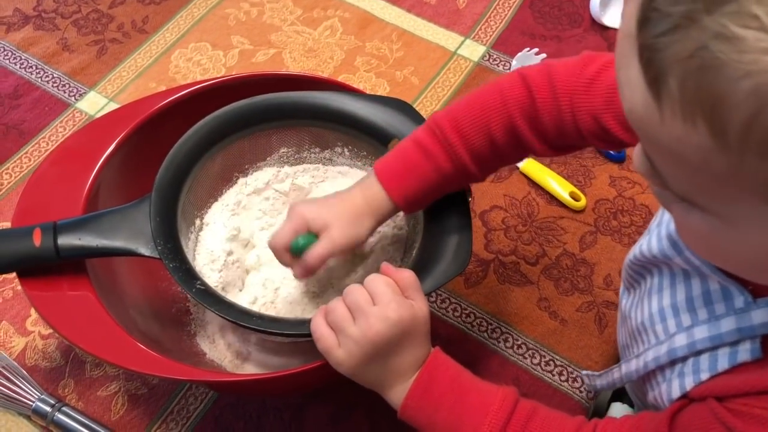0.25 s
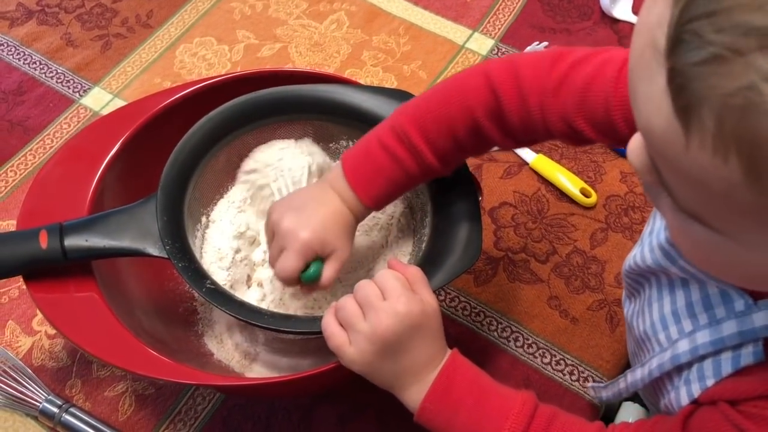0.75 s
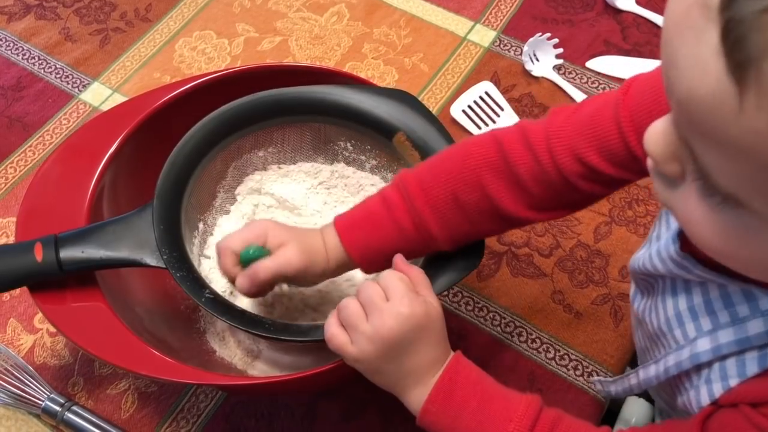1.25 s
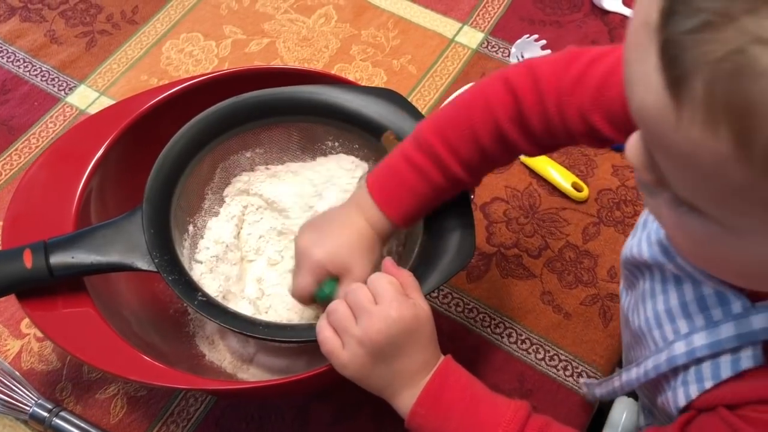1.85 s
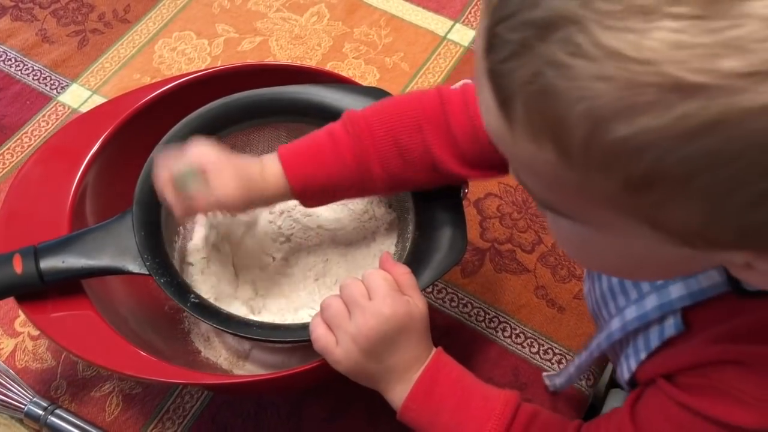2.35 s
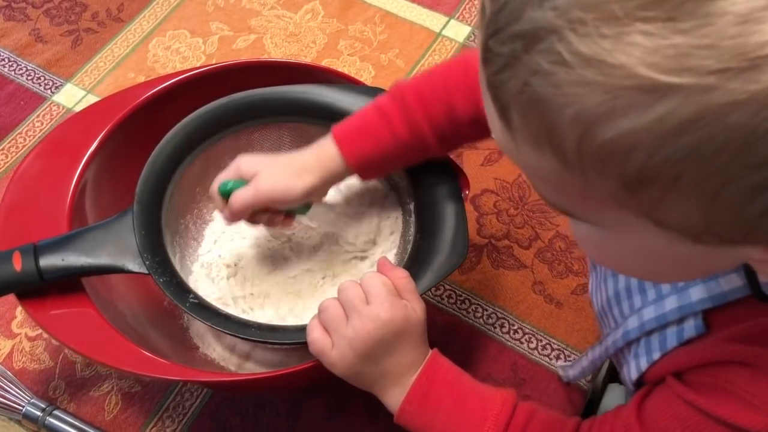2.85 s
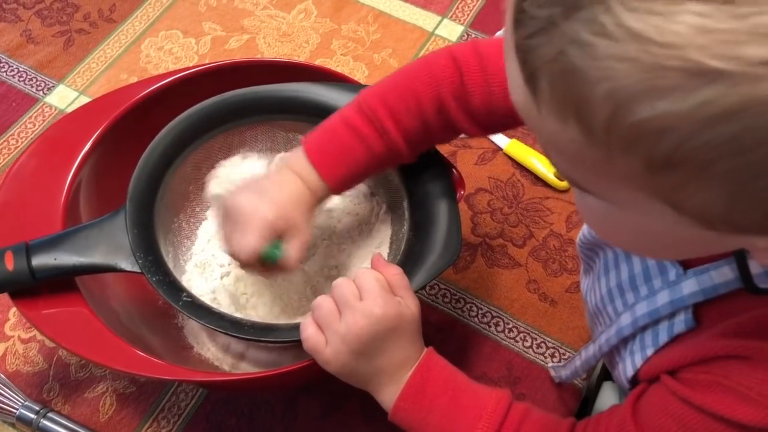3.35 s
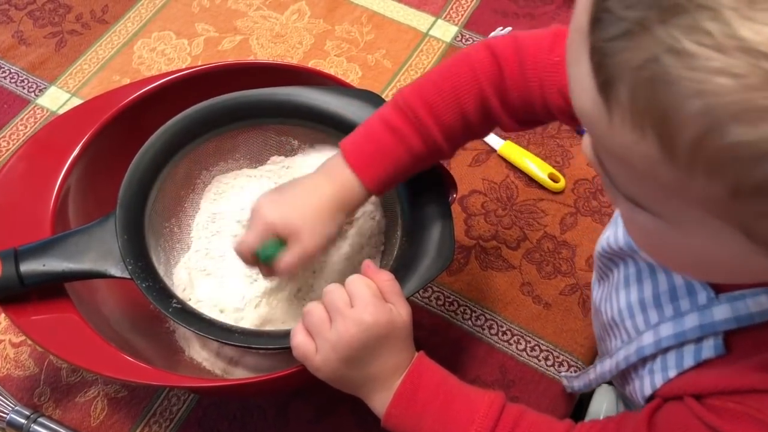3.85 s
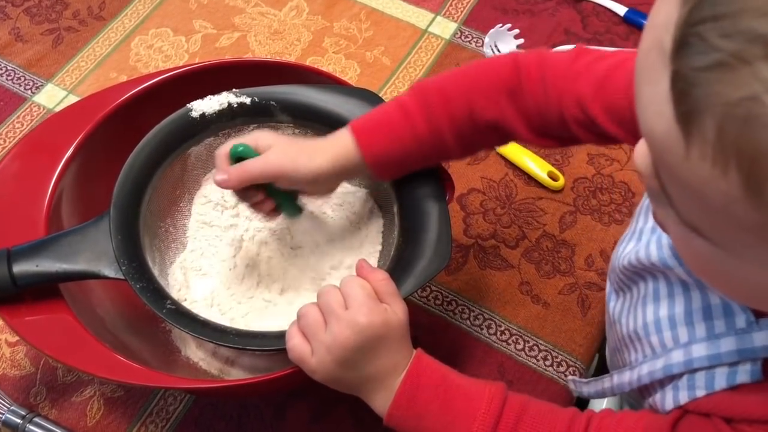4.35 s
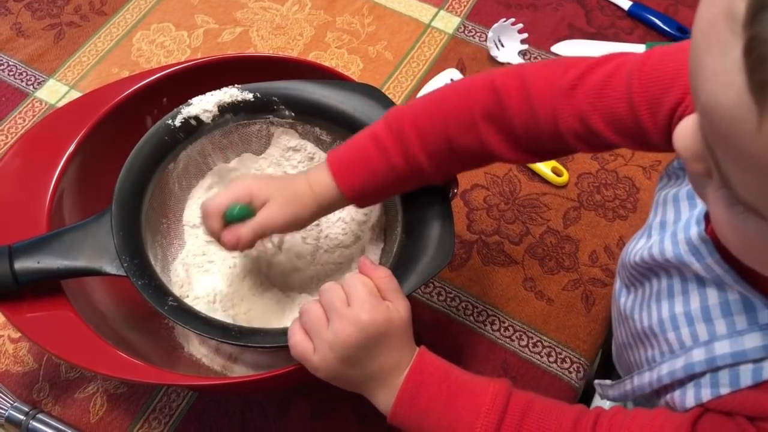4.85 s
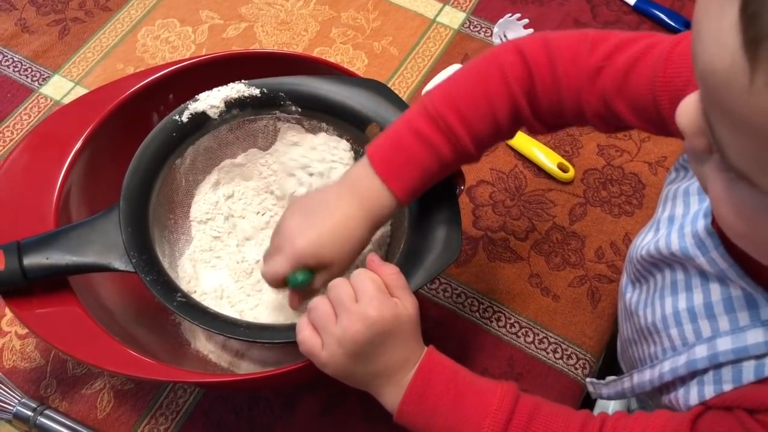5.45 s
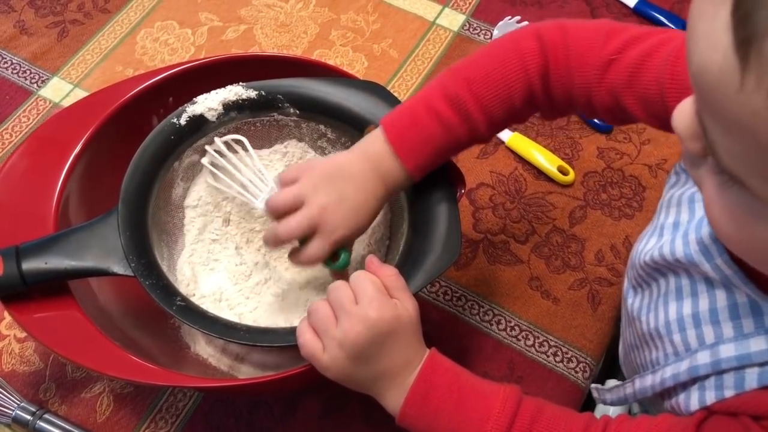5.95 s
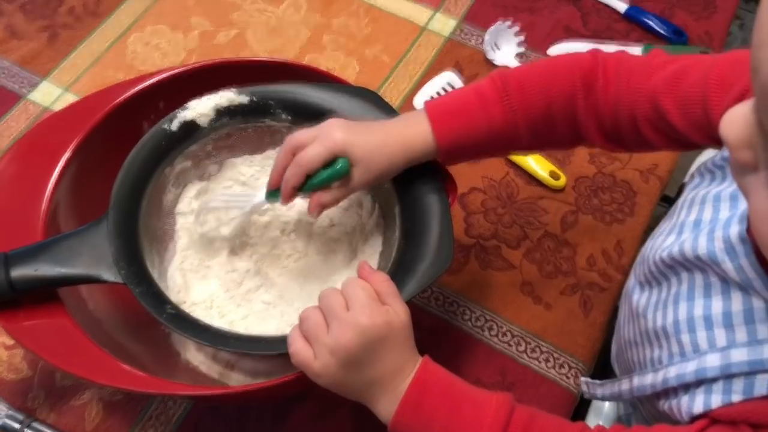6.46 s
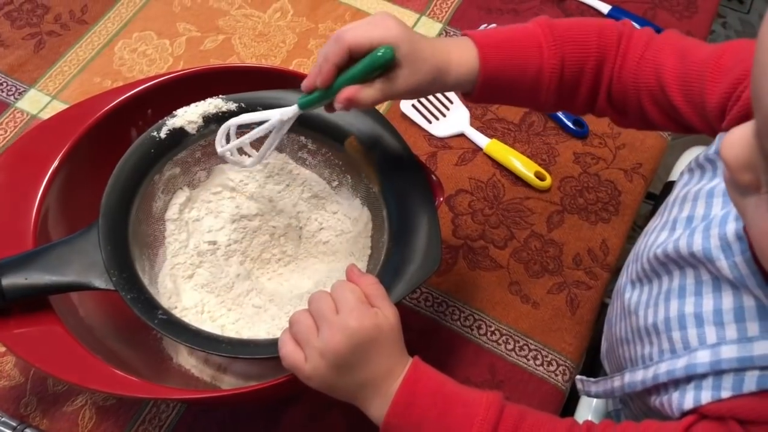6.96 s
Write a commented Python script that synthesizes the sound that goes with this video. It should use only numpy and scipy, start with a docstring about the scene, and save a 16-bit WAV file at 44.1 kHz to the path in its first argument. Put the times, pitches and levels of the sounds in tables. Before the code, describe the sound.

Close up in a quiet kitchen, irregular raspy scratching and soft flour crunches mix with wiry taps and brief squeaks, thinning to stillness.

```python
"""First a crunching push and a creak: a small plastic whisk works flour in a mesh sieve, in a bowl on a table.
Its loops catch and slip on the mesh, driving damped resonances of frame and wires, with rasp and hiss.
Packed flour collapses in falling sweeps: tiny ones make the crunch, larger ones soft single thuds.
Short hard scrapes, ringing taps and thin squeaks break up the strokes; late come one deep pat and a faint rustle.
A short echo and quiet, steady room air surround it."""
import sys
import numpy as np
from scipy import signal
from scipy.fft import rfft, irfft, next_fast_len
from scipy.io import wavfile
from scipy.ndimage import map_coordinates

SR = 44100
rng = np.random.default_rng(int(sys.argv[2]) if len(sys.argv) > 2 else 0)


def to_wav(sig):
    """Store sig (one row per channel, or 1-D mono) as 16-bit WAV at the path in sys.argv[1].

    Samples outside -1..1 are clipped; the rate is SR.
    """
    pcm = np.clip(np.atleast_2d(sig), -1, 1) * 32767
    pcm = np.round(pcm).astype(np.int16)
    wavfile.write(sys.argv[1], SR, pcm.T)  # frames by channels


N = 317872

# Spectrum of the room air: (frequency [Hz], relative density [dB])
AIR_SPECTRUM = [(15, -33), (25, -28), (55, -5.5), (145, -4), (175, -6.5), (200, -9), (335, -13), (384, -15),
                (503, -15), (1260, -21), (1520, -24), (1890, -25.5), (16000, -34)]
AIR_DB = -62.5

# Pushes of the whisk through the flour; the last row is a faint rustle, perhaps of a sleeve:
# (start [s], attack [s], hold [s], release [s], flour drive [dB], frame drive [dB], mesh drive [dB])
STROKES = [(0, 0.0033, 0.065, .03, -41.5, -44, -48.5), (0.063, 0.026, 0.027, 0.092, -38.5, -37.5, -40.5),
           (0.145, 0.021, 0.096, 0.05, -43, -42, -50.5), (0.595, 0.031, 0.019, 0.083, -52, -45, -44),
           (0.726, 0.041, 0.029, 0.021, -40, -46, -47), (0.966, .2, 0.03, 0.035, -40, -43, -47.5),
           (1.234, 0.013, 0.038, 0.093, -40, -51.5, -54.5), (1.414, 0.096, 0.089, 0.028, -35.5, -39.5, -42),
           (1.569, 0.039, 0.083, 0.016, -37, -37, -41), (1.767, 0.018, 0.029, 0.014, -42.5, -36.5, -39.5),
           (1.9, 0.014, 0.023, 0.036, -39.5, -45, -45), (2.056, 0.013, .01, 0.045, -45, -39.5, -47.5),
           (2.372, 0.068, 0.02, 0.044, -37, -38, -37), (2.604, 0.053, 0.033, .025, -38, -44.5, -39.5),
           (2.731, 0.031, .07, 0.033, -40.5, -41.5, -42), (2.819, 0.035, 0.051, 0.018, -39.5, -36.5, -41),
           (3.099, .012, 0.051, 0.019, -33, -35, -32.5), (3.389, 0.017, 0.038, .03, -41.5, -35.5, -49.5),
           (3.44, 0.036, 0.034, 0.0056, -40.5, -47, -39), (3.727, 0.059, 0.043, 0.05, -44, -38.5, -38),
           (3.84, .04, 0.087, .02, -42, -40, -42.5), (3.95, 0.027, 0.019, 0.016, -39, -43, -30.5),
           (4.31, .04, .045, .01, -72, -75, -64), (4.403, 0.026, 0.027, 0.041, -42.5, -34.5, -40.5),
           (4.53, 0.1, 0.019, 0.022, -43.5, -36.5, -37), (4.758, 0.028, .06, 0.054, -65, -58.5, -57.5),
           (4.924, 0.062, .17, 0.045, -73, -67, -67.5), (5.199, 0.047, 0.062, 0.037, -40.5, -38, -47.5),
           (5.297, .025, 0.018, 0.023, -49, -44, -45.5), (5.362, 0.036, 0.071, 0.08, -50.5, -49.5, -55.5),
           (5.504, 0.061, 0.035, 0.027, -40, -36, -39), (6.236, 0.039, 0.0095, 0.011, -44, -47, -43.5),
           (6.356, 0.046, .012, 0.023, -51.5, -55, -49.5), (6.832, 0.065, 0.041, 0.067, -71, -74, -66.5)]
SWELL_DB = 12.5  # a stroke builds up by this much over its attack
SETTLE_DB, SETTLE_S = -29.5, .085  # a weak trembling goes on after each stroke
# Short hard scrapes: (start [s], length [s], flour drive [dB], frame drive [dB], mesh drive [dB])
SCRAPES = [(0.256, 0.026, -44, -44, -51), (0.441, 0.027, -44, -44.5, -49.5),
           (0.551, 0.025, -42.5, -45.5, -51), (0.628, 0.017, -38.5, -38.5, -47),
           (0.734, 0.028, -46, -34.5, -41.5), (0.806, 0.018, -33.5, -37, -40),
           (.855, 0.02, -32.5, -43, -44), (1.767, 0.016, -35.5, -24.5, -33),
           (1.855, 0.02, -45.5, -43, -44.5), (1.899, 0.0094, -38, -39, -54), (1.975, 0.03, -40, -42.5, -43),
           (2.104, .006, -35, -46, -47), (2.136, 0.027, -39.5, -34, -40.5), (2.18, 0.0065, -41, -36, -42),
           (2.196, .02, -40.5, -36, -42.5), (2.24, 0.0062, -38, -54, -56), (2.273, 0.0081, -37, -30, -43.5),
           (2.321, 0.035, -35, -34, -44), (2.935, 0.0065, -40, -43, -48), (2.96, 0.0057, -35, -47, -60),
           (3.062, 0.014, -38, -24, -25.5), (3.249, 0.018, -49, -48, -55), (3.301, .019, -46, -30, -38.5),
           (3.383, 0.021, -39, -34.5, -41), (3.582, 0.027, -44.5, -43, -40.5),
           (3.616, 0.0071, -42, -59, -49), (3.641, 0.012, -62, -37, -49), (3.722, .012, -48, -47, -35),
           (4.073, 0.015, -47, -44, -46), (4.082, 0.012, -42.5, -32.5, -32.5), (4.401, .02, -47, -40, -45),
           (4.675, 0.031, -48.5, -62, -44.5), (5.21, 0.032, -61, -42, -54), (4.728, 0.011, -47, -60, -43),
           (5.645, 0.018, -44, -41.5, -47), (5.778, 0.027, -47.5, -35.5, -43),
           (5.802, 0.026, -40, -37.5, -35.5), (6.21, .012, -59, -62, -63)]
# Light drag of the buried whisk: (flour drive [dB], frame drive [dB], mesh drive [dB])
DRAG_DB = (-54.5, -72, -62.5)
# Spans in which the whisk drags, buried: (start [s], end [s])
BURIED_SPANS = [(0, 2.97), (3.06, 4.05)]

# Spectrum of the flour crunch at its middle pitch: (frequency [Hz], relative density [dB])
CRUNCH_SPECTRUM = [(40, -39), (100, -12.5), (200, -9.5), (300, -0.5), (400, 0), (500, -0.5), (620, -1),
                   (900, -0.5), (2000, -40.5), (6000, -63)]
CRUNCH_HZ = 418.8  # the middle pitch
# Pitch of the crunch, lower where the whisk is buried deeper: (time [s], pitch [Hz])
CRUNCH_PITCH = [(0, 431.8), (.8, 361.4), (1.299, 325.2), (1.68, 459.9), (2.1, 330), (2.55, 450.4),
                (2.9, 406.6), (3.15, 510), (3.4, 385.7), (3.8, 510.5), (4.429, 569.3), (5.56, 431.4),
                (6.4, 438.8)]

# Resonances of the sieve's frame: (frequency [Hz], bandwidth [Hz], relative level [dB])
FRAME_MODES = [(730, 113, -9.5), (867.5, 44, -2), (975.4, 59, -1.5), (1135, 110, -7)]
# Resonances of the stretched mesh and the loops: (frequency [Hz], bandwidth [Hz], relative level [dB])
MESH_MODES = [(1340, 74, -0.5), (1563, 330, -4.5), (1990, 180, -1.5), (2110, 1340, 0.5), (2910, 220, 1.5),
              (3300, 240, 2.5), (3540, 270, -2), (4240, 220, -1), (4800, 500, -4), (5570, 390, -2),
              (7050, 180, -9)]
# Spectrum of the rasp of loops on wires: (frequency [Hz], relative density [dB])
RASP_SPECTRUM = [(400, -32), (900, -8), (1300, 3.5), (1900, 3.5), (2450, -1.5), (3100, 2), (3800, -4.5),
                 (4400, -3.5), (5200, -29), (7000, -19.5), (16000, -50)]
# Spectrum of the fine hiss: (frequency [Hz], relative density [dB])
HISS_SPECTRUM = [(2000, -57.5), (4500, 5.5), (6000, 6), (8000, 6), (10000, 3), (12500, 1), (15500, -0.5)]
# Drive of the hiss against that of the mesh at a firm push; extra dB for each dB pushed harder
HISS_DB, HISS_GROWTH, FIRM_PUSH_DB = -10.5, 0.029, -44.5
# Sifted flour trickling through the mesh: (time of peak [s], half length [s], hiss drive [dB])
TRICKLES = [(3.16, .02, -44), (3.234, 0.0023, -33), (4.013, 0.016, -45), (4.376, .04, -63),
            (4.67, 0.031, -43), (5.14, 0.2, -65), (5.612, 0.014, -47), (5.814, 0.012, -36.5),
            (6.44, 0.14, -66)]

# Creaks of squeezed flour: (start [s], length [s], level [dB], first pitch [Hz], last pitch [Hz])
CREAKS = [(.02, 0.063, -39.5, 508, 434), (0.171, 0.057, -40.5, 627, 440), (1.166, 0.057, -42, 426, 273.7),
          (2.431, 0.056, -42, 476, 406), (3.126, 0.062, -33, 725, 514), (3.723, 0.023, -39, 711, 506),
          (3.785, 0.07, -40.5, 544.4, 383.3), (3.79, 0.051, -34.5, 1028, 834),
          (3.967, 0.0393, -35, 1124, 1418), (4.436, 0.069, -47, 320, 349.7),
          (5.237, 0.066, -42.5, 472, 562.6)]
# Squeaks of a loop sliding on the mesh: (start [s], length [s], level [dB], first pitch [Hz], last pitch [Hz])
SQUEAKS = [(.365, .02, -47, 2450, 3100), (4.765, .25, -60, 2440, 2340)]
# Loops snapping against the sieve: (time [s], click [dB], frame knock [dB], loop pitch [Hz])
TAPS = [(.367, -50, -60, 2530), (.558, -47, -56, 3100), (.657, -42, -47, 1400), (.821, -38, -42, 2780),
        (.852, -33, -38, 3100), (1.5395, -37, -42, 1870), (1.7665, -29, -29, 1530), (1.857, -39, -46, 1900),
        (1.87, -41, -47, 1900), (1.9015, -44, -46, 1600), (1.923, -41, -46, 3000), (2.1105, -37, -46, 3100),
        (2.178, -39, -38, 1600), (2.275, -42, -43, 1600), (2.3215, -35, -37, 1730),
        (2.9625, -35, -36, 1540), (3.0645, -25, -26, 1560), (3.1005, -29, -41, 3140),
        (3.231, -26, -40, 3160), (3.256, -40, -47, 3150), (3.3055, -38, -29, 1210), (3.37, -45, -43, 1210),
        (3.386, -37, -38, 3190), (3.7245, -36, -43, 2120), (4.736, -41, -49, 3180),
        (5.2015, -48, -47, 1300), (6.5103, -54, -56, 1520)]
# Spectrum of the tap's chatter: (frequency [Hz], relative density [dB])
CLICK_SPECTRUM = [(200, 5), (900, 5.5), (1600, 11.5), (2300, -6.5), (3100, 12.5), (4500, -6.5), (5800, 0.5),
                  (8000, -10), (15500, -19)]
# Lumps of flour giving way: (time [s], peak level [dB], starting pitch [Hz], length [s])
THUDS = [(.91, -35, 614, 0.0084), (1.187, -38, 443, 0.015), (1.213, -32, 459, 0.013),
         (1.483, -58, 613, 0.016), (3.238, -30, 550, 0.0072), (3.27, -33, 598.4, 0.0091),
         (4.007, -30.5, 1065, 0.0104), (4.655, -34, 897.6, 0.00946)]
# One pat deep into the flour: (time [s], peak level [dB], starting pitch [Hz], length [s])
PAT = (6.5115, -36, 340, .031)
TOP_HZ = 16300  # upper limit of the recorder


def undb(db):
    """Logarithmic level: decibels to amplitude gain."""
    return 10 ** (np.asarray(db) / 20)


def unit(h):
    """Energy normalization: the squares sum to 1."""
    return h / np.sqrt(np.sum(h ** 2))


def through(x, h):
    """Convolution: a linear system is known by its impulse response."""
    return signal.oaconvolve(x, h)[:N]


def add(out, start_s, sound):
    """Superposition: sounds sum where they overlap."""
    i = max(int(start_s * SR), 0)
    out[i:i + len(sound)] += sound[:N - i]


def colour(points, size=4096):
    """Minimum phase: folding the cepstrum gives a causal response of the given spectrum."""
    hz, db = np.transpose(points)
    f = np.maximum(np.fft.rfftfreq(size, 1 / SR), 1)
    level_db = np.interp(np.log(f), np.log(hz), db)
    cepstrum = irfft(np.log(undb(level_db)))
    cepstrum[1:size // 2] *= 2
    cepstrum[size // 2 + 1:] = 0
    return unit(irfft(np.exp(rfft(cepstrum))))


def walk(rate):
    """Band-limited chance: random knots, `rate` a second, joined by lines; spread near 1."""
    knots = np.arange(N) / SR * rate
    # joining by lines narrows the spread; the factor restores it
    return np.interp(knots, np.arange(4096), rng.standard_normal(4096)) * np.sqrt(1.5)


def kitchen():
    """Stationary noise: the quiet steady air of the room."""
    return through(rng.standard_normal(N), colour(AIR_SPECTRUM)) * undb(AIR_DB)


def stroke(attack_s, hold_s, release_s, edge_s=0.00083):
    """Contact envelope: a stroke bites, swells, holds, lets go and settles exponentially."""
    age = np.arange(SR) / SR
    after = np.maximum(age - attack_s - hold_s, 0)
    bite = np.minimum(age / edge_s, 1)
    swell = undb(-SWELL_DB * np.maximum(1 - age / attack_s, 0))
    settling = undb(SETTLE_DB) * np.exp(-after / SETTLE_S)
    return bite * swell * np.maximum(np.exp(-after / release_s), settling)


def scrape(length_s, rise_s=.0025, release_s=0.0056, sag_db_per_s=50):
    """Contact envelope: a scrape rises at once, sags slightly and lets go."""
    age = np.arange(SR // 10) / SR
    shape = np.minimum(age / rise_s, 1) * np.exp(-np.maximum(age - length_s, 0) / release_s)
    return shape * undb(-sag_db_per_s * (age - length_s / 2))


def pressure():
    """Power addition: drag, strokes and scrapes add as powers to drive flour, frame and mesh."""
    t = np.arange(N) / SR
    contacts = [(s, stroke(attack, hold, release), dbs) for s, attack, hold, release, *dbs in STROKES]
    contacts += [(s, scrape(length), dbs) for s, length, *dbs in SCRAPES]
    buried = sum((t >= start) & (t < end) for start, end in BURIED_SPANS)
    power = np.outer(undb(DRAG_DB) ** 2, buried)
    for s, shape, dbs in contacts:
        for row, db in zip(power, dbs):
            add(row, s, (shape * undb(db)) ** 2)
    return np.sqrt(power)


def slips(rate, spread_db):
    """Shot noise: random little jolts of uneven size, `rate` a second, rms 1."""
    happens, size = rng.random(N) < rate / SR, rng.standard_normal(N)
    jolts = happens * undb(spread_db * np.clip(size, -2, 2)) * rng.choice([-1, 1], N)
    return unit(jolts) * np.sqrt(N)


def thud(hz, length_s, fall=2.325):
    """Dispersion: high tones outrun low ones in loose powder, so a jolt comes out as a falling sweep."""
    u = np.arange(0, 1, 1 / (length_s * SR))
    phase = 2 * np.pi * np.cumsum(hz * np.exp(-fall * u)) / SR
    return np.sin(phase) * np.minimum(u / 0.051, 1) * np.cos(np.pi * u / 2)


def flour(drive, rate=220):
    """Granular collapse: packed flour gives way in many tiny thuds, lower when the whisk is deeper."""
    sizes = [(1100, 0.0061), (826, 0.01172), (668.6, 0.01723)]  # starting Hz and length s, before repitching
    grains = sum(through(slips(rate, 1.46), unit(thud(hz, length))) for hz, length in sizes)
    crunch = unit(through(grains, colour(CRUNCH_SPECTRUM))) * np.sqrt(N)
    # reading the crunch slower or faster shifts its pitch
    speed = np.interp(np.arange(N) / SR, *np.transpose(CRUNCH_PITCH)) / CRUNCH_HZ
    place = np.cumsum(speed) % N
    return drive * map_coordinates(crunch, [place], order=3, mode="nearest")


def stick_slip(rate=105, uneven=.55, relax_s=0.0044, held=0.41, spread_db=1.5, count=2000):
    """Stick-slip friction: tension lets go in uneven jerks that each die away, over a held part; rms 1."""
    chance = rng.standard_normal((count, 2))
    starts = np.cumsum(np.exp(uneven * chance[:, 0])) / rate - .1
    t = np.arange(N) / SR
    last = np.searchsorted(starts, t) - 1
    size = undb(spread_db * np.clip(chance[last, 1], -2, 2))
    jerks = size * np.exp((starts[last] - t) / relax_s)
    return unit(held + jerks) * np.sqrt(N)


def ring(x, modes, wander_db, bend=0.025):
    """Modal resonance: mode shares wander with the point of contact, pitch with the tension."""
    shares = undb([db + wander_db * walk(11) for _, _, db in modes])
    shares = shares / np.sqrt(np.sum(shares ** 2, axis=0))
    clock, out = np.cumsum(1 + bend * walk(14)) / SR, 0
    for k, (hz, width, _) in enumerate(modes):
        turn, keep = np.exp(2j * np.pi * hz * clock), np.exp(-np.pi * width / SR)
        # shift the mode down to 0 Hz, let it decay there, then shift it back
        gain = np.sqrt(2 * (1 - keep ** 2))
        swing = signal.lfilter([gain], [1, -keep], x * shares[k] * turn.conj())
        out = out + (-1) ** k * (swing * turn).imag
    return out


def shifting(x, wander_db=3.0, rate=24):
    """Moving contact: as other loops and wires touch, overlapping bands wander in level."""
    edges = np.geomspace(1000, SR / 2, num=22)
    size = next_fast_len(N)
    f, spectrum, out = np.fft.rfftfreq(size, 1 / SR), rfft(x, size), 0
    for share in np.eye(len(edges)):
        band = irfft(spectrum * np.interp(f, edges, share), size)[:N]
        out = out + band * undb(wander_db * (walk(rate) - 0.16))
    return out


def powder(mesh):
    """Power-law drive: fine hiss grows faster than the rasp, and sifted flour adds to it in power."""
    t = np.arange(N) / SR
    rubbed = mesh * undb(HISS_DB) * (mesh / undb(FIRM_PUSH_DB)) ** HISS_GROWTH
    trickled = sum(undb(db) * np.exp(-((t - s) / half) ** 2) for s, half, db in TRICKLES)
    return np.hypot(rubbed, trickled)


def sieve(frame, mesh, hiss, frame_db=-1, modes_db=-5, rasp_db=-2, grit_db=5.5):
    """Friction-driven resonance: juddering slips ring frame and mesh and shed rasp and a little hiss."""
    judder = stick_slip()
    catches = slips(3500, 3) * judder
    grit = 0.76 * slips(4500, grit_db) * judder + .5 * slips(2200, grit_db)
    frame_ring = undb(frame_db) * ring(catches * frame, FRAME_MODES, 2.37)
    mesh_ring = undb(modes_db) * ring(catches * mesh, MESH_MODES, 1.6)
    rasp = undb(rasp_db) * through(grit * mesh, colour(RASP_SPECTRUM))
    fine_hiss = through(grit * hiss, colour(HISS_SPECTRUM))
    return frame_ring + mesh_ring + shifting(rasp + fine_hiss)


def creaks(waver=0.044, rough_db=2.5):
    """Locked stick-slip: squeezed flour gives a brief, rough, gliding tone."""
    out, pitch, loudness = np.zeros(N), 1 + waver * walk(350), undb(rough_db * walk(220))
    for s, length, db, first_hz, last_hz in CREAKS:
        u = np.linspace(0, 1, int(length * SR))
        span = int(s * SR) + np.arange(len(u))
        glide_hz = first_hz * (last_hz / first_hz) ** u * pitch[span]
        phase = 2 * np.pi * np.cumsum(glide_hz) / SR
        envelope = np.sqrt(2 * np.abs(np.sin(np.pi * u)))
        add(out, s, undb(db) * loudness[span] * envelope * np.sin(phase))
    return out


def squeak(rate=1200, width_hz=190, frame_db=-4):
    """Friction-sustained mode: slips keep a loop ringing as its tension shifts, and stir the frame."""
    out = np.zeros(N)
    for s, length, db, first_hz, last_hz in SQUEAKS:
        u = np.clip((np.arange(N) / SR - s) / length, 0, 1)
        rub = slips(rate, 1.5) * undb(db) * np.sin(np.pi * np.sqrt(u))  # rises fast, fades slowly
        decay = np.exp(-np.pi * width_hz * np.arange(SR // 20) / SR)
        swing = through(rub, unit(decay))
        phase = 2 * np.pi * np.cumsum(first_hz + (last_hz - first_hz) * u) / SR
        out += np.sqrt(2) * swing * np.sin(phase) + undb(frame_db) * ring(rub, FRAME_MODES, 0.79)
    return out


def mode(hz, width_hz, size=3000):
    """Damped oscillation: one resonance of energy 1."""
    t = np.arange(size) / SR
    return unit(np.exp(-np.pi * width_hz * t) * np.sin(2 * np.pi * hz * t))


def taps(chatter_s=0.0032, knock_s=0.00073, loop_db=-4, loop_width_hz=130, modes_db=-7, size=900):
    """Impact excitation: a brief chatter on the wires rings loop and mesh and knocks the frame."""
    clicks, knocks, loops, t = np.zeros(N), np.zeros(N), np.zeros(N), np.arange(size) / SR
    spread = np.sqrt(SR / 250)  # table levels stand for energy averaged over 4 ms
    for (s, click_db, knock_db, hz), chance in zip(TAPS, rng.standard_normal((len(TAPS), size))):
        add(clicks, s, spread * undb(click_db) * unit(chance * np.exp(-t / chatter_s)))
        add(loops, s, spread * undb(click_db + loop_db) * mode(hz, loop_width_hz))
        add(knocks, s + knock_s, spread * undb([knock_db]))
    chatter = through(clicks, colour(CLICK_SPECTRUM))
    mesh_ring = undb(modes_db) * ring(clicks, MESH_MODES, 4.0)
    return chatter + loops + mesh_ring + ring(knocks, FRAME_MODES, 1)


def lumps():
    """Dispersion in powder: larger lumps thud singly, and the deep pat sweeps furthest down."""
    out = np.zeros(N)
    for s, db, hz, length in THUDS:
        add(out, s, undb(db) * thud(hz, length, fall=1.2))
    s, db, hz, length = PAT
    add(out, s, undb(db) * thud(hz, length, fall=2.3))
    return out


def room(x, t60_s=0.55, dull_hz=5500, wet_db=-17, delay_s=.006):
    """Reverberation: the kitchen walls return a dense, slightly dull, exponentially decaying echo."""
    t = np.arange(SR // 2) / SR
    tail = rng.standard_normal(len(t)) * np.exp(-np.log(1000) * t / t60_s) * (t > delay_s)
    tail = signal.sosfilt(signal.butter(1, dull_hz, fs=SR, output="sos"), tail)
    return x + undb(wet_db) * through(x, unit(tail))


def scene():
    """Superposition: whisk, flour and sieve close by, in a quiet kitchen."""
    crunch, frame, mesh = pressure()
    whisk = flour(crunch) + sieve(frame, mesh, powder(mesh)) + creaks() + squeak() + taps()
    return (room(whisk) + lumps() + kitchen())[None]


def record(dry):
    """Band limiting: the microphone drops the deepest bass; the recorder cuts the top."""
    dry = signal.sosfilt(signal.butter(3, 32, "high", fs=SR, output="sos"), dry)
    return signal.sosfilt(signal.ellip(10, .2, 80, TOP_HZ, fs=SR, output="sos"), dry)


dry = scene()
out = record(dry)
to_wav(out)
```